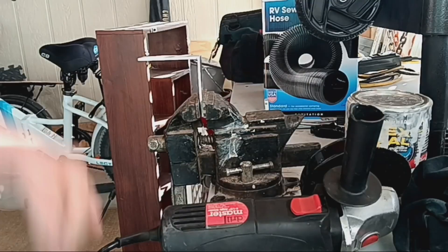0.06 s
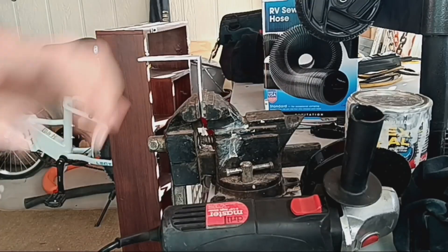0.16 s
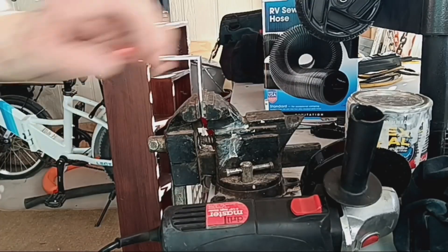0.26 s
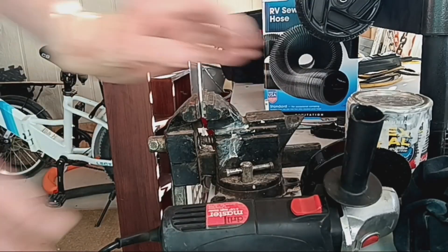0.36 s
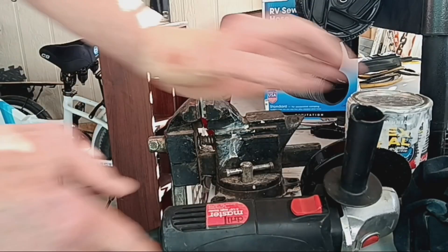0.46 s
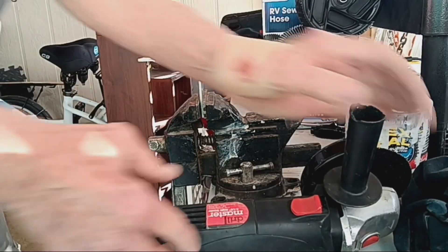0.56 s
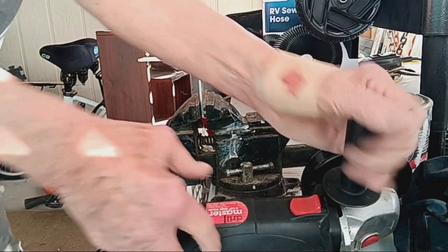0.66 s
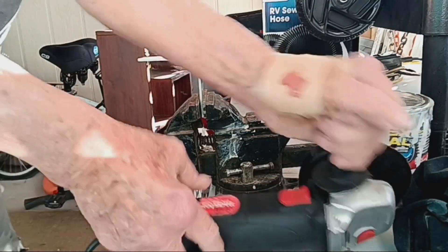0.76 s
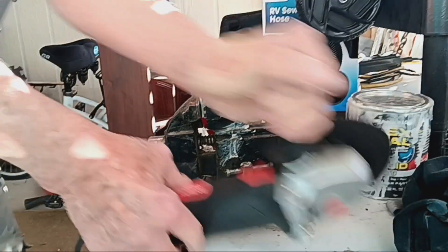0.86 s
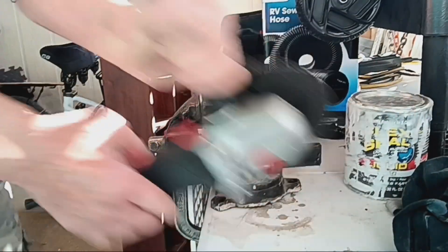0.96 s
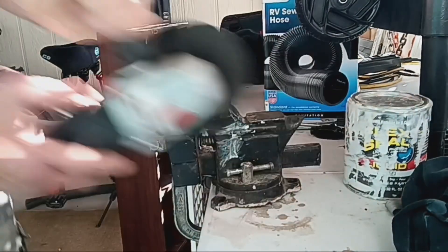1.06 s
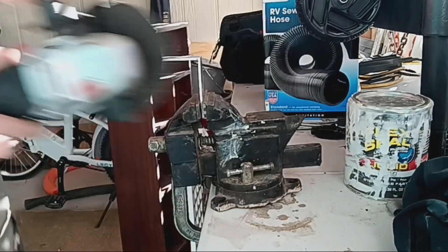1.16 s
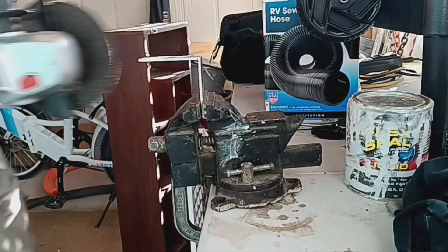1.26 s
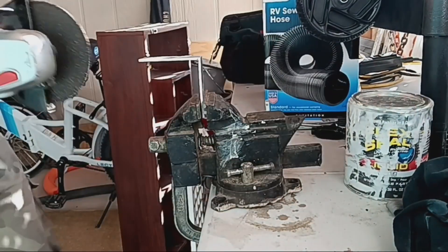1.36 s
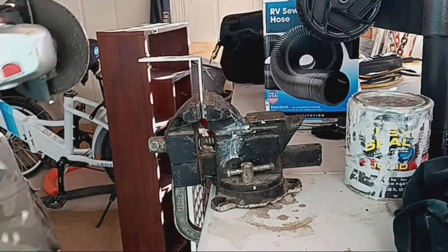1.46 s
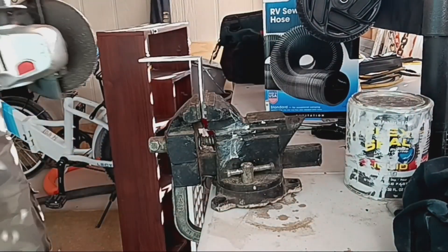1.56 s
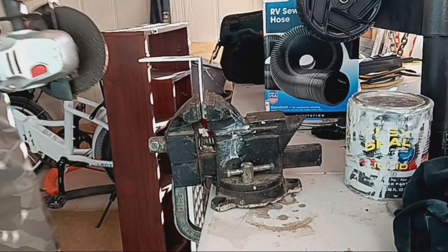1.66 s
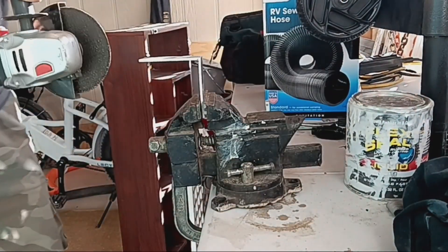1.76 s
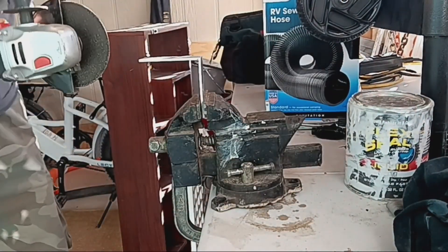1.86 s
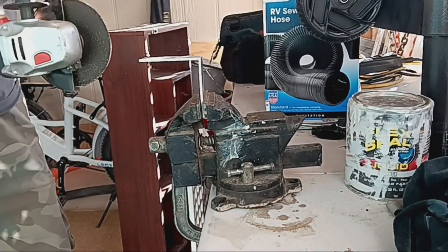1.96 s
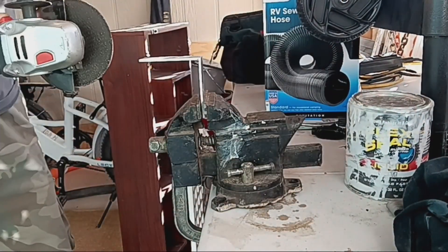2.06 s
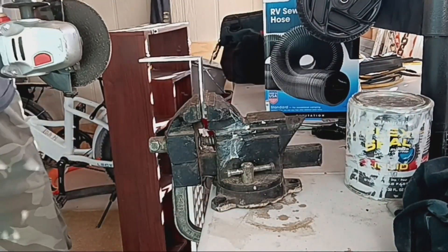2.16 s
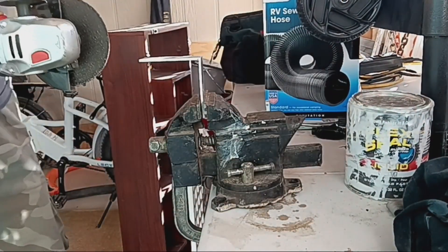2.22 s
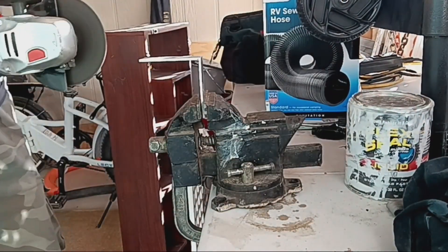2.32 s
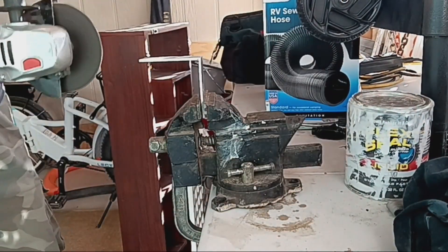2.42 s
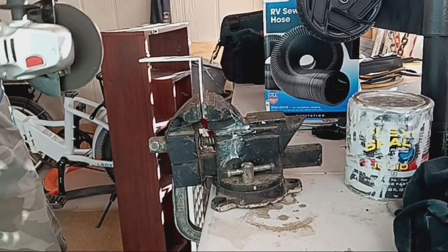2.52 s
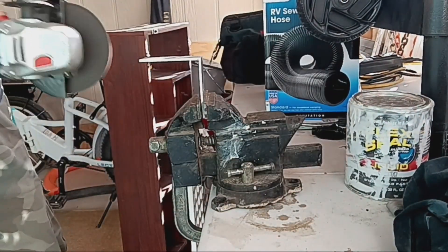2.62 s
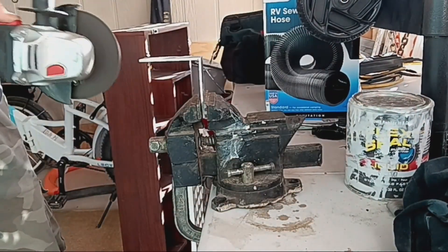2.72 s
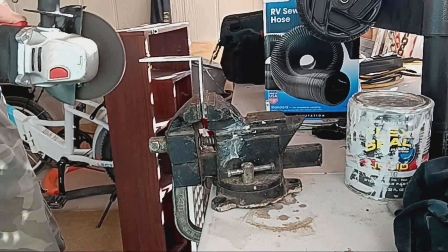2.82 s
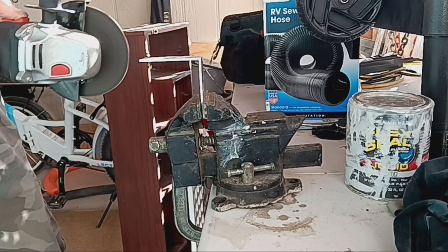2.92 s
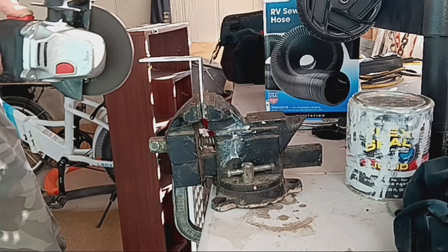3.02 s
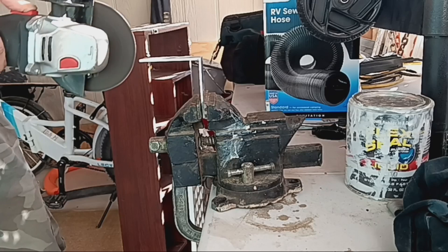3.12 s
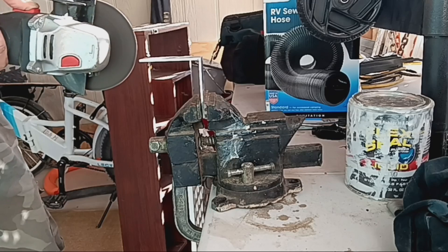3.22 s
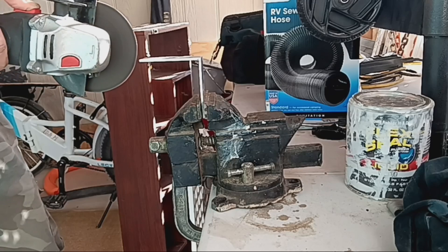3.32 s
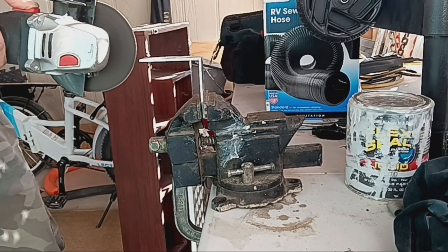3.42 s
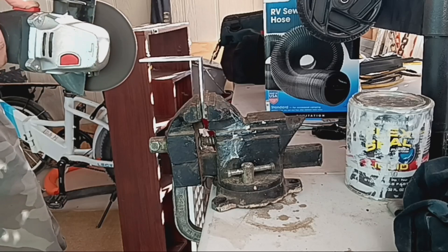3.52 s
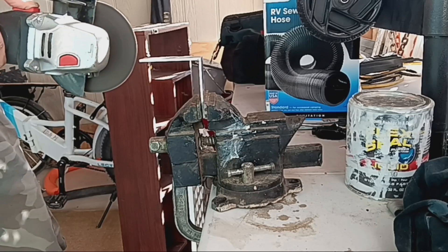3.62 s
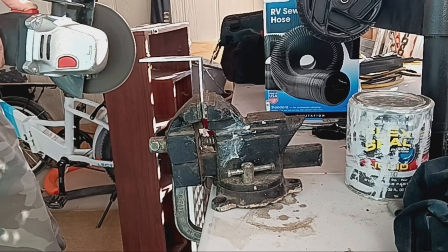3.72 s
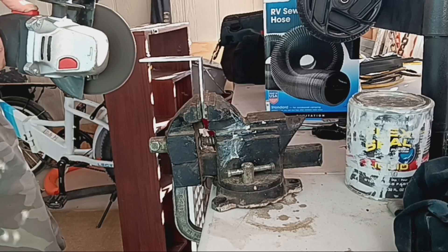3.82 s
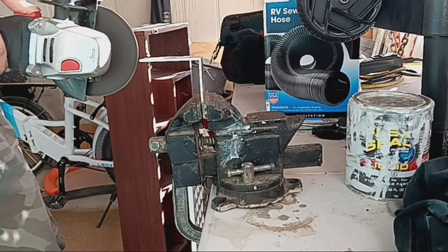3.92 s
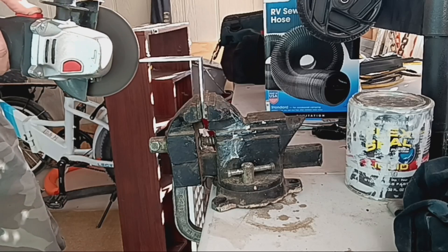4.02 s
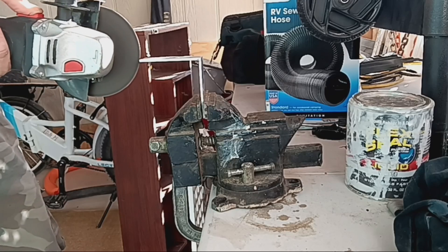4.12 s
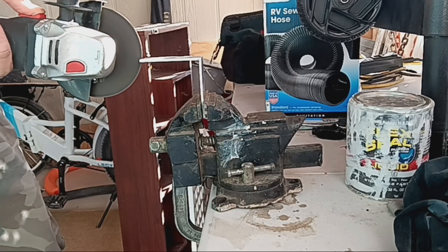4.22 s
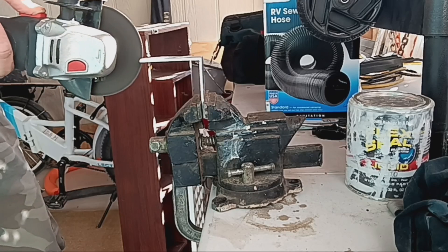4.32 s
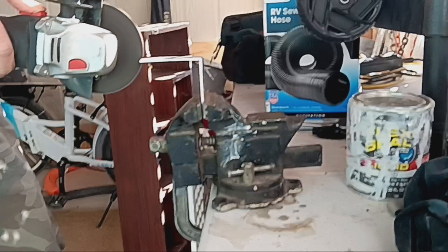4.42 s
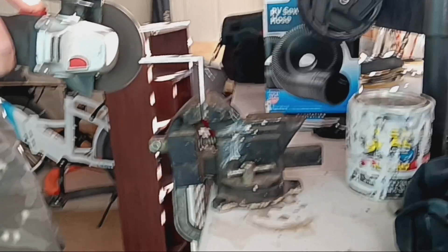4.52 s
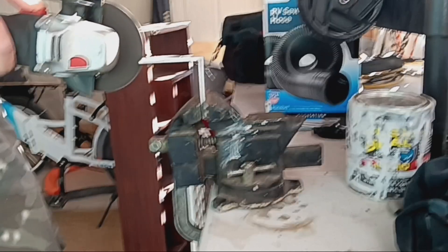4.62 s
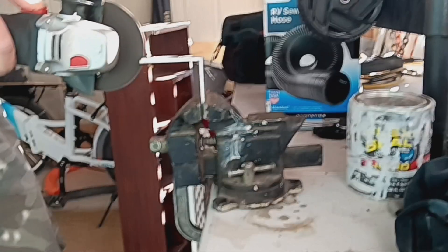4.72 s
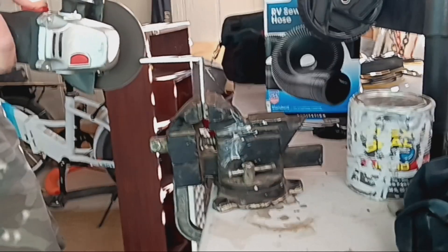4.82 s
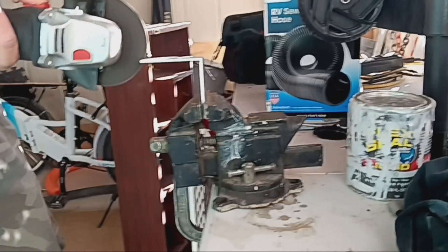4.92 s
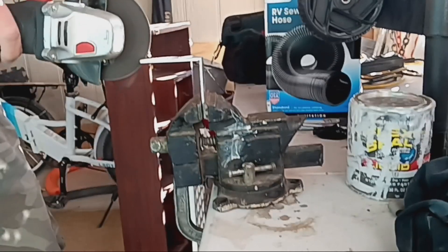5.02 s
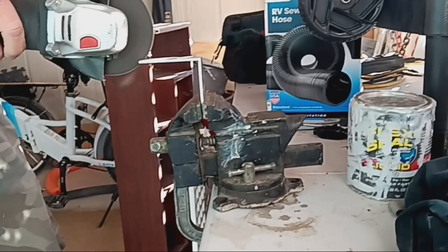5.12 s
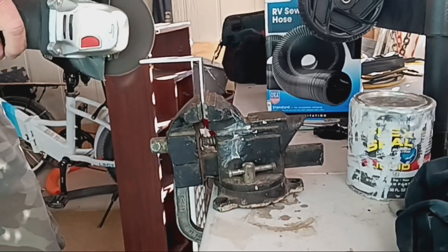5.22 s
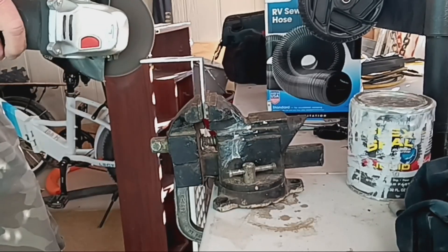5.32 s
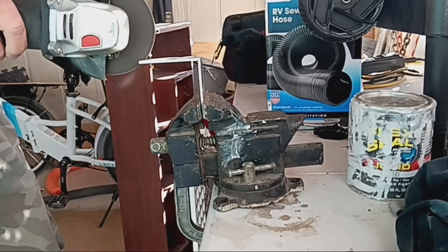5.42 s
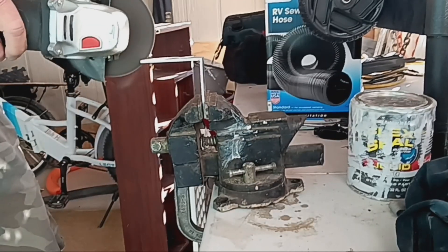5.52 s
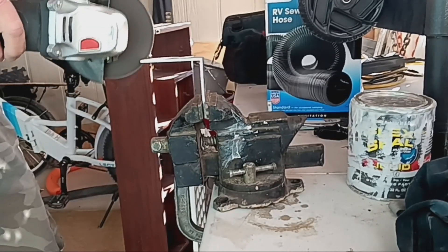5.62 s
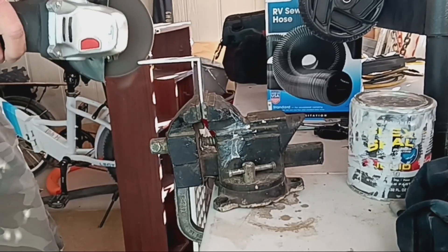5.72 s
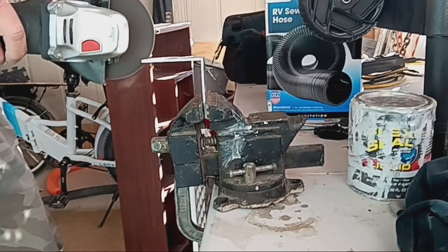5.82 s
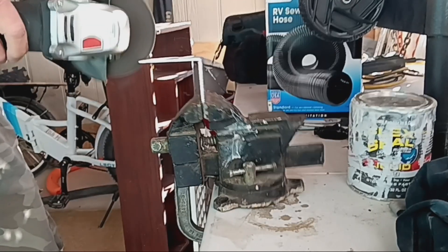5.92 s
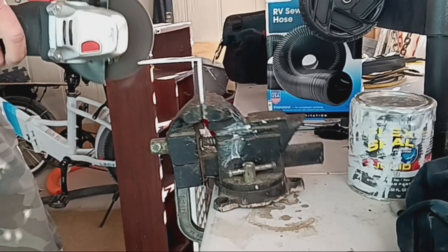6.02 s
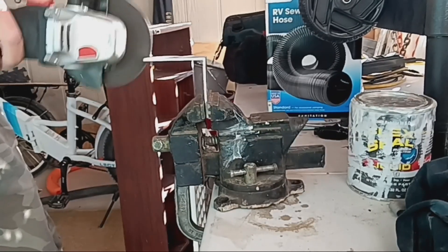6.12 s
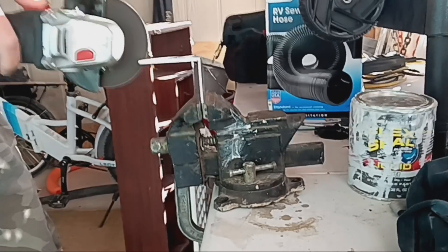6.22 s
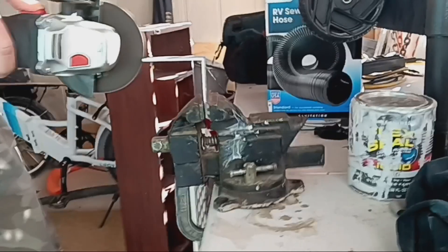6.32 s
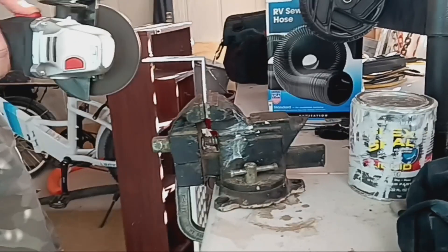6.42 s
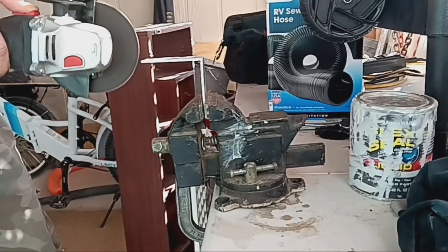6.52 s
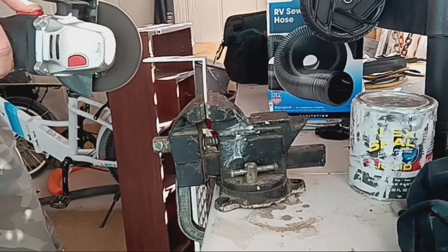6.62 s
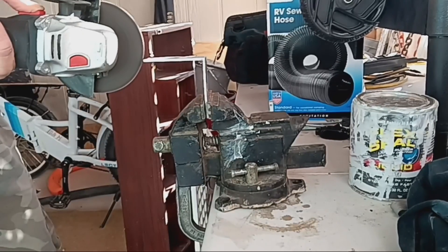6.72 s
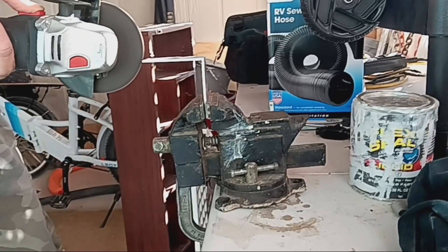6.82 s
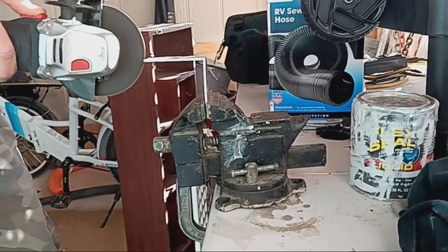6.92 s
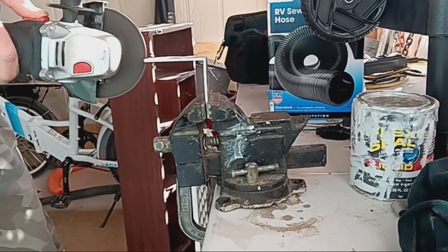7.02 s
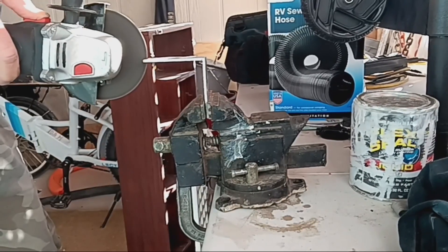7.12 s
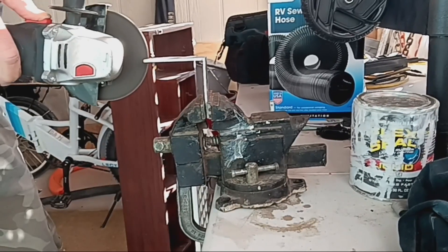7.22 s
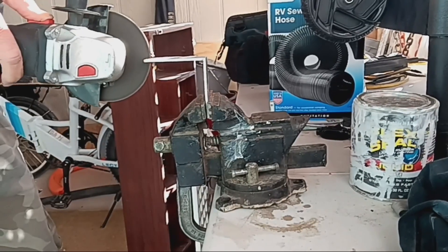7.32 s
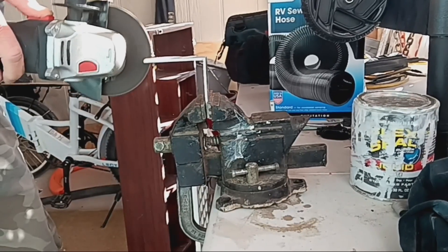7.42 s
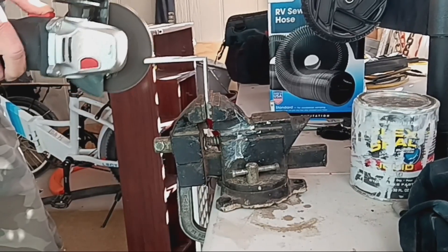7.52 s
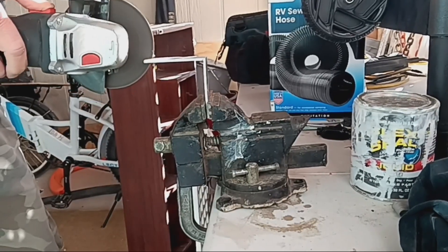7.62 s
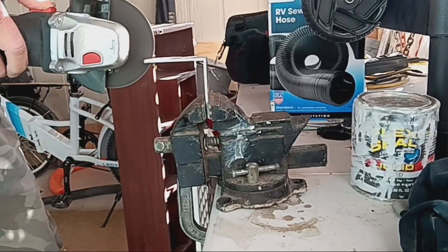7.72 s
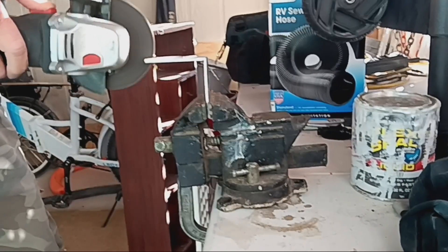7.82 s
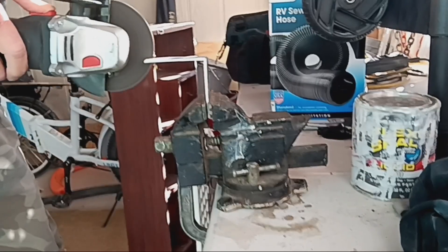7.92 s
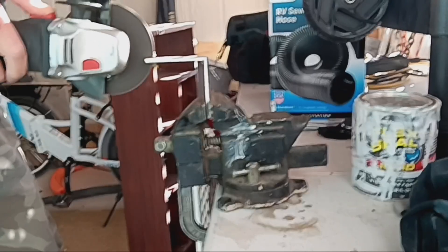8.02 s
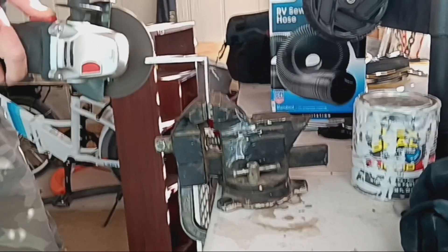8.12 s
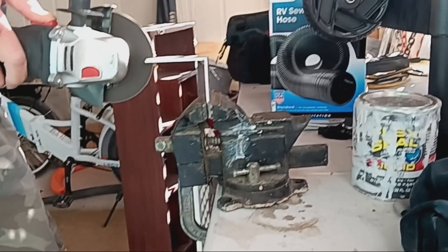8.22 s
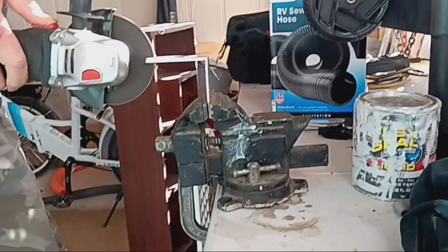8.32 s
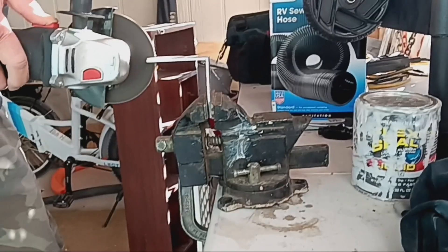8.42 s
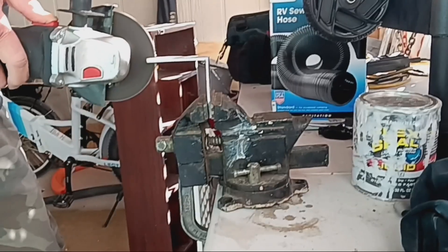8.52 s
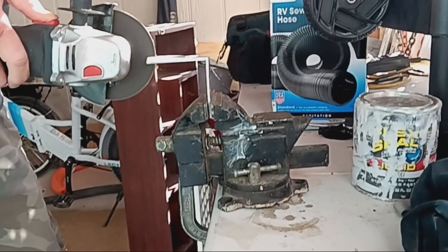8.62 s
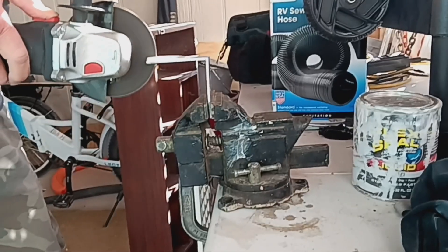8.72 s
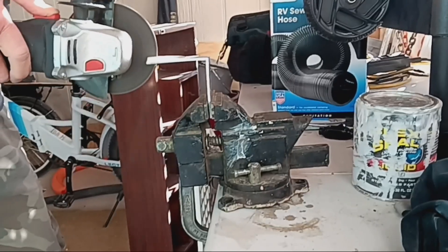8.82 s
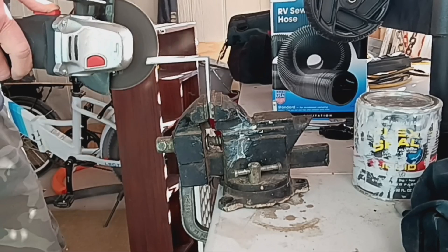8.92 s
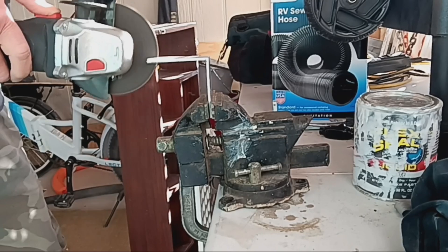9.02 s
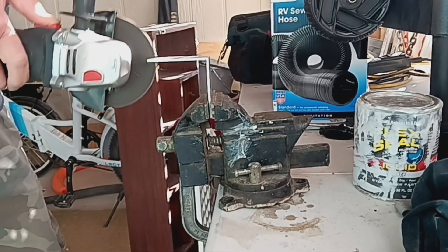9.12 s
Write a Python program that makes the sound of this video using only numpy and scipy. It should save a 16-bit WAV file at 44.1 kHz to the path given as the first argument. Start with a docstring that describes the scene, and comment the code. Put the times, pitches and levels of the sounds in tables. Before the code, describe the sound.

Bumps and plastic clicks, then a power tool revs into a loud rattling whine and its disc tears through metal twice, screeching brightly.

```python
"""An angle grinder is lifted off a workshop bench, switched on and pressed twice into a steel bar held in a vice.
Its motor runs up: fan and gear noise makes the housing ring, the gears rattle and the guard answers their clacks.
In the cut, many tiny blows of grit tear at the steel while disc and bar sing in narrow, sliding rings.
Sparks pelt the two ports of a phone standing close by, which overloads; bumps reach it through its stand.
Clicks, scuffs, rumble, sliding and three juddering jerks go with the handling; a thin hiss fills the quiet before."""
import sys
import numpy as np
from scipy import signal
from scipy.fft import rfft, irfft
from scipy.io import wavfile

SR = 44100
rng = np.random.default_rng(int(sys.argv[2]) if len(sys.argv) > 2 else 0)


def transcribe(u):
    """Save the signal u as a 16-bit wav file named by the first command-line argument.

    u: samples, shape (n,) or (channels, n), limited to [-1, 1]; the rate is SR.
    q: integer samples, one column per channel.
    """
    v = np.clip(np.atleast_2d(u).T, -1, 1)
    q = np.round(v * 32767).astype(np.int16)
    wavfile.write(sys.argv[1], SR, q)


N = 403956
TIME = np.arange(N) / SR


def undb(db):
    """Decibels to gain."""
    return 10 ** (np.asarray(db) / 20)


def unit(x):
    """Scale to rms 1."""
    return x / np.sqrt(np.mean(x ** 2))


def curves(rows):
    """Each column of a table of (time [s], ..) rows as a line through time."""
    s, *columns = np.transpose(rows)
    return [np.interp(TIME, s, c) for c in columns]


def gate(start, end, fade):
    """Open from start to end, with straight fades inside."""
    return np.clip(np.minimum(TIME - start, end - TIME) / fade, 0, 1)


def swell(s, rise_s, fall_s):
    """Rises to 1 at time s and dies away, by 20 dB in each of the given times."""
    return undb(-20 * np.maximum((s - TIME) / rise_s, (TIME - s) / fall_s))


def lag(x, seconds):
    """Follow x sluggishly, with a time constant."""
    keep = np.exp(-1 / (seconds * SR))
    return signal.lfilter([1 - keep], [1, -keep], x)


def walk(rate):
    """Smooth random wandering with a spread near 1, heading for a new value rate times a second."""
    knots = rng.standard_normal(N // 8)
    return 1.2 * np.interp(TIME * rate, np.arange(len(knots)), knots)


def noise():
    """Unrelated noise for the two ports."""
    return rng.standard_normal((2, N))


def impacts(rate, scatter_db):
    """Random tiny blows of uneven size, rate per second, unrelated at the two ports."""
    return (rng.random((2, N)) < rate / SR) * noise() * undb(scatter_db * noise())


def colour(x, points):
    """Shape the tone through (frequency [Hz], level [dB]) points, with a filter that never acts early."""
    size = 8192
    hz, db = np.transpose(points)
    gain = undb(np.interp(np.log(np.fft.rfftfreq(size, 1 / SR) + 1), np.log(hz), db))
    # folding the cepstrum puts the whole response after the sound that excites it
    cepstrum = irfft(np.log(gain))[:size // 2]
    cepstrum[1:] *= 2
    response = irfft(np.exp(rfft(cepstrum, size)))[:size // 2]
    return signal.oaconvolve(x, response[None], axes=-1)[:, :N]


def resonate(x, hz, width_hz):
    """One resonance, gain 1 at its centre."""
    peak = signal.iirpeak(min(hz, SR / 2 - 1), hz / min(width_hz, SR / 4), fs=SR)
    return signal.lfilter(*peak, x)


def add(track, s, sound):
    """Mix a short sound in at time s."""
    i = int(s * SR)
    track[:, i:i + sound.shape[-1]] += sound[..., :N - i]


def split(left_minus_right_db):
    """Gains that favour the left port over the right by the given level."""
    return undb(np.array([[left_minus_right_db], [-left_minus_right_db]]) / 2)


# the switch closes, then the motor takes hold
SWITCH_S, START_S = 2.157, 2.17
# free speed, speed at which back voltage halves the current, pull at standstill, drag of a full cut
FREE_HZ, HALF_CURRENT_HZ, PULL_HZ_PER_S, DRAG_HZ_PER_S = 546, 300.5, 7600, 360
# level setting at free speed, change towards standstill, gain while the switch closes, change at full load
MOTOR_DB, STANDSTILL_DB, SWITCH_DB, LOADED_DB = -11.5, -3.5, -12, -5.5

# rush of fan, brushes and gears: (frequency [Hz], level per Hz [dB])
RUSH_TONE = [(60, -28), (300, -19.5), (800, -22), (1400, -17.5), (1850, -8.5), (2500, -9.5), (3900, -6.5),
             (6500, -3), (7800, -5), (8700, -3.5), (9600, 4), (11200, -7.5), (13500, -10.5), (15500, -12.5)]


def motor(shaft_hz, load, ideal_hz=600, rattle_share=.47, ring_db=-6.0, recover_s=0.2):
    """A series motor throbs with the mains, rattles while the gears pull the disc up, and recedes under load."""
    angle = 2 * np.pi * np.cumsum(shaft_hz * (1 + 0.00307 * walk(40))) / SR
    slip = np.clip(1 - shaft_hz / ideal_hz, 0, 1)  # the current falls as the speed rises
    strain = lag(load, recover_s)
    mains = np.cos(2 * np.pi * 120 * TIME)
    # the backlash rattle slows down as the torque eases
    rattle_hz = rattle_share * ideal_hz * slip * (1 + .2 * walk(50))
    rattle = np.cos(2 * np.pi * np.cumsum(rattle_hz) / SR)
    throb_db = 4 * slip * mains + 2.0 * np.sqrt(slip) * rattle + 0.89 * walk(150)
    drive = (radiated() + shaft_harmonics(angle)) * undb(throb_db)
    rush = unit(colour(drive, RUSH_TONE))
    ring = undb(ring_db) * unit(housing_ring(drive))
    sound = rush + ring + guard(rattle, load) + whine(shaft_hz, angle, strain)
    power = np.maximum(undb(SWITCH_DB) * gate(SWITCH_S, np.inf, .002), gate(START_S, np.inf, 0.003))
    speed_db = STANDSTILL_DB * (1 - shaft_hz / FREE_HZ)
    return power * undb(MOTOR_DB + speed_db + LOADED_DB * strain) * sound


def shaft_speed(load):
    """Turns per second: torque goes with the square of the current, against friction and the drag of the cut."""
    def torque(hz):
        return PULL_HZ_PER_S / (1 + hz / HALF_CURRENT_HZ) ** 2

    hop = 64  # samples per step
    hz, speeds = 0., []
    for s, drag in zip(TIME[::hop], DRAG_HZ_PER_S * load[::hop]):
        if s > START_S:
            # friction just balances the pull at free speed
            hz = max(hz + (torque(hz) - torque(FREE_HZ) - drag) * hop / SR, 0)
        speeds.append(hz)
    return np.interp(TIME, TIME[::hop], speeds)


def radiated(shared=0.35, lag_s=0.001155):
    """Noise of the tool at the two ports: partly diffuse, partly one sound that comes later on the left."""
    left, right = noise()
    share = np.clip(shared, 0, 1)
    late = np.roll(right, int(lag_s * SR))
    return np.array([share * late + np.sqrt(1 - share ** 2) * left, right])


# tones that sweep through the housing's resonances: (multiple of shaft speed, level before wandering [dB])
SHAFT_TONES = [(3, -26), (5, -23), (6, -31), (8, -26), (9, -28.5), (10, -24.5), (11, -37)]


def shaft_harmonics(angle):
    """Tones at whole multiples of the shaft speed, each wandering in strength."""
    tones = 0
    for multiple, db in SHAFT_TONES:
        start_phase = rng.uniform(0, 2 * np.pi, (2, 1))
        tones = tones + undb(db + 5.26 * walk(8.2)) * np.sin(round(multiple) * angle + start_phase)
    return tones


# resonances of gear head and disc: (frequency [Hz], width [Hz], relative level [dB])
HOUSING_RINGS = [(1423, 51, -8), (1580, 126, -6), (2310, 84, -12), (2600, 110, -11), (3280, 190, -2),
                 (3525, 75, 0), (4400, 180, 0.5), (4880, 150, -1), (5480, 96, -2), (6220, 170, -7.5),
                 (6910, 85, 2), (8780, 135, 2.5)]


def housing_ring(drive):
    """Gear head and disc resonate; each resonance comes and goes as the tool turns in the hands."""
    return sum(undb(db + 1.9 * walk(9)) * resonate(drive, hz, width) for hz, width, db in HOUSING_RINGS)


# running free; change when held still by the load; push as the disc springs clear, and its settling time
GUARD_DB, GUARD_HELD_DB, GUARD_SHAKEN_DB, GUARD_SETTLE_S = -19, -10, 23, .35


def guard(rattle, load, hz=4400, width_hz=80, clack_db=10, grip_s=0.031):
    """Every clack of the gears strikes the loose guard, hardest just after the load lets go."""
    clacks = radiated() * undb(clack_db * rattle)
    held = lag(load, grip_s)
    shaken = np.maximum(lag(load, GUARD_SETTLE_S) - held, 0)
    level = undb(GUARD_DB + GUARD_HELD_DB * held + GUARD_SHAKEN_DB * shaken)
    return level * unit(resonate(clacks, hz, width_hz))


# how well the body radiates the shaft's whine: (shaft speed [Hz], level before load and wandering [dB])
WHINE_LEVEL = [(190, -57), (270, -29), (440, -24), (510, -32.5), (548, -40)]


def whine(shaft_hz, angle, strain, loaded_db=-5):
    """A pure tone at the shaft speed, weaker under load."""
    db = np.interp(shaft_hz, *np.transpose(WHINE_LEVEL)) + loaded_db * strain + 0.96 * walk(20)
    return undb(db) * np.sin(angle + np.array([[0], [1]]))


# grinding of a graze, and grinding that counts as a full load; fade of each touch
GRAZE_GRIT_DB, FULL_GRIT_DB, BITE_FADE_S = -29, -24.5, .025

# levels here come before the gains of grit and sparks
# the disc grazes the bar throughout each pass: (start [s], end [s], spark stream [dB])
GRAZES = [(4.11, 6.2, -26), (6.979, 9.2, -36.5)]
# it skips and bites briefly on the way in and out: (start [s], end [s], spark stream [dB], grinding [dB])
SHORT_BITES = [(4.13, 4.185, -18.5, -25), (4.205, 4.31, -19, -26), (6.05, 6.17, -15, -23.5),
               (6.98, 7.035, -27, -26), (7.06, 7.115, -28.5, -25), (7.145, 7.222, -20.5, -23)]
# hand pressure, one list for each of the two long cuts: (time [s], spark stream [dB], grinding [dB])
LONG_CUTS = [
    [(4.31, -27, -20), (4.328, -17, -24.5), (4.688, -16, -25), (5.8, -14.5, -25), (5.834, -21.5, -25),
     (5.872, -14, -26), (5.994, -17.5, -26.5), (6.01, -26.5, -26)],
    [(7.23, -26, -24), (7.25, -16, -27), (7.288, -16, -25), (7.686, -16, -27), (8.164, -18, -27.5),
     (8.868, -14.5, -25), (8.976, -19.5, -28.5), (9.16, -17.5, -29.5)],
]


def contact():
    """Strength of the spark stream and of the grinding: a graze, brief bites and the long cuts."""
    stream = bite = 0
    for start, end, stream_db in GRAZES:
        graze = gate(start, end, BITE_FADE_S)
        stream = stream + graze * undb(stream_db)
        bite = bite + graze * undb(GRAZE_GRIT_DB)
    touches = list(SHORT_BITES)
    for rows in LONG_CUTS:
        touches.append((rows[0][0], rows[-1][0] + BITE_FADE_S, *curves(rows)))
    for start, end, stream_db, bite_db in touches:
        touch = gate(start, end, BITE_FADE_S)
        stream = np.maximum(stream, touch * undb(stream_db))
        bite = np.maximum(bite, touch * undb(bite_db))
    return stream, bite


# grit tearing steel: (frequency [Hz], level per Hz [dB])
GRIT_TONE = [(800, -19.5), (2400, -1), (4000, -6), (5800, -3.5), (6800, -6), (7600, -2.5), (8500, 0.5),
             (9600, -2), (11000, -0.5), (12200, -7.5), (13300, -0.5), (14400, -4.5), (15700, -10)]


def grit(bite, shaft_hz, level_db=13):
    """Abrasive grains tear the steel in tiny blows, unevenly over each turn of the disc."""
    disc_turns = np.cumsum(shaft_hz) / SR / 2.7  # the bevel gear slows the disc
    scrub = undb(0.44 * np.cos(2 * np.pi * disc_turns) + 0.96 * walk(60) + 0.37 * walk(16))
    return undb(level_db) * unit(colour(impacts(16000, 1.6), GRIT_TONE)) * bite * scrub


# a spark striking a port: (frequency [Hz], level per Hz [dB])
SPARK_TONE = [(20, -15), (50, -1), (150, 0), (400, -3), (1000, -5.5), (2000, -10), (4000, -11.5),
              (7000, -23), (12000, -37)]


def sparks(stream, level_db=6, left_db=4.5, rate=2200, crackle_db=-11, crackle_hz=1200):
    """Sparks strike the ports: a thin stream is a few separate pops, a full one a roar."""
    density = np.clip(stream / stream.max(), .01, 1)
    pelting = impacts(rate * density, 2.2) / np.sqrt(density)
    # coarser chips come in flurries and crackle on the case
    chips = impacts(1200 * density, 1.8) / np.sqrt(density)
    crackle = unit(resonate(chips, crackle_hz, 1.53 * crackle_hz)) * undb(crackle_db + 2.6 * walk(12))
    flutter = undb(1.44 * np.array([walk(45), walk(45)]) + 2.3 * walk(22))
    return undb(level_db) * split(left_db) * (unit(colour(pelting, SPARK_TONE)) + crackle) * stream * flutter


# rings of disc and bar; most in the cut sink as the steel heats and the slot deepens:
# (start [s], end [s], start pitch [Hz], end pitch [Hz], width [Hz], relative level [dB])
SLIDING_RINGS = [(2.18, 2.36, 2620, 2560, 160, -7), (2.18, 2.55, 8700, 8750, 400, -3),
                 (2.59, 2.71, 2240, 2320, 60, -14), (4.14, 4.45, 9250, 9050, 130, -5),
                 (4.3, 4.79, 8740, 8530, 80, -2.5), (4.17, 6.15, 11900, 10950, 190, -6),
                 (4.14, 4.9, 10600, 10380, 150, -3), (4.85, 6.08, 10260, 10160, 120, -.5),
                 (4.8, 6.0, 9400, 9250, 130, -4.5), (4.3, 6.1, 6850, 6700, 220, -4.5),
                 (5.0, 6.1, 15700, 15620, 100, -10), (6.875, 6.905, 10850, 10800, 150, 6),
                 (6.99, 7.25, 7080, 7050, 130, -3), (7.3, 9.16, 6900, 6780, 170, -10),
                 (6.99, 9.16, 8680, 8430, 100, -6.5), (7.28, 8.68, 10760, 9900, 130, 1.5),
                 (7.9, 9.16, 10350, 9980, 200, -3), (8.7, 9.16, 9550, 9350, 180, -4),
                 (7.05, 7.7, 12680, 12560, 140, -12)]


def singing(level_db=-17, flutter_db=2.5):
    """Narrow rings, mostly of disc and bar, kept going by gears and grit, each sliding slowly in pitch."""
    out = np.zeros((2, N))
    for start, end, from_hz, to_hz, width_hz, db in SLIDING_RINGS:
        opening = gate(start - .012, end + .012, .024)
        span = opening > 0
        strength = (opening * undb(db + flutter_db * walk(18)))[span]
        pitch_hz = np.interp(TIME[span], [start, end], [from_hz, to_hz])
        phase = 2 * np.pi * np.cumsum(pitch_hz) / SR
        # slow noise on a sine and a cosine makes a narrow band around the sliding pitch
        kicks = rng.standard_normal((2, 2, N // 2))[..., :len(phase)]
        a, b = unit(signal.lfilter([1], [1, -np.exp(-np.pi * width_hz / SR)], kicks))
        out[:, span] += strength * (a * np.cos(phase) + b * np.sin(phase))
    return undb(level_db) * out


# what the phone's case rings with: (frequency [Hz], level [dB], time to fall 60 dB [s])
CASE_RINGS = [(422, -20, 0.016), (830, -19, 0.021), (1210, -22, 0.018), (1650, -21, 0.017),
              (2050, -34, .009), (2500, -39, .008)]
# bumps that reach the phone through its stand: (time [s], thud [dB], tap [dB], left minus right [dB])
STAND_BUMPS = [(.41, -46, -41, 0), (.444, -45, -30, 0), (0.6625, -12, -10, 1), (.733, -31, -24, 10),
               (1.195, -44, -45, -1), (1.4223, -22, -8.5, -0.5), (1.85, -42, -31, 0),
               (1.908, -34, -21.5, -1), (2.268, -32, -12.5, 0), (2.438, -29, -27, -2),
               (3.169, -9.5, -13, -0.5), (3.45, -33, -21, -2), (4.12, -10.5, -12.5, 0.5),
               (4.154, -12, -18, 4), (4.419, -15.5, -18, 3), (6.023, -10.5, -20, -9),
               (6.601, -11.5, -13, -2), (6.875, -17, 1.5, 12), (7.232, -9.5, -24, 0), (9.126, -11, -20, 3)]


def bumps(stand_hz=66, stand_t60=0.07, tap_s=0.00043):
    """Each bump is a sharp tap with a short ring of the case, then the phone rocks on its stand."""
    out, t = np.zeros((2, N)), TIME[:SR // 5]
    rocking = np.cos(2 * np.pi * stand_hz * t - .3) * undb(-60 * t / stand_t60)
    thud = 2.0 * rocking * (1 - np.exp(-t / 0.0018))
    ring = sum(np.sin(2 * np.pi * hz * t) * undb(db - 60 * t / t60) for hz, db, t60 in CASE_RINGS)
    tap = (1 - np.exp(-t / .0001)) * np.exp(-t / tap_s) + ring
    tap = signal.sosfilt(signal.butter(8, 2600, fs=SR, output="sos"), tap)
    for s, thud_db, tap_db, pan_db in STAND_BUMPS:
        add(out, s, (undb(thud_db) * thud + undb(tap_db) * tap) * split(pan_db))
    return out


# clicks of the grinder's handle, guard and cord: (time [s], peak level [dB], centre [Hz])
PART_CLICKS = [(0.729, -22, 2870), (.767, -29, 7000), (.877, -25, 6500), (.978, -15, 8650),
               (.979, -21.5, 2720), (.982, -16, 4500), (1.009, -22, 10000), (1.03, -24, 9000),
               (1.309, -36, 6000), (1.339, -27, 11000), (1.432, -22, 9700), (1.452, -33, 10000),
               (1.507, -32, 9600), (1.530, -29, 10600), (1.614, -25, 10500), (1.659, -34, 10000),
               (1.698, -27, 10400), (1.723, -16, 10900), (1.74, -28, 10000), (1.894, -30, 10200),
               (6.876, -2, 1500)]


def clicks(click_t60=0.012, width_hz=2800, tail_t60=0.31, tail_db=-28):
    """Loose plastic parts tick: short resonant noise, with a short tail from the room."""
    out, t = np.zeros((2, N)), TIME[:SR // 5]
    decay = undb(-60 * t / click_t60) + undb(tail_db - 60 * t / tail_t60)
    for s, db, hz in PART_CLICKS:
        burst = rng.standard_normal((2, len(t))) * decay
        tick = resonate(resonate(burst, hz, width_hz), hz, width_hz)
        add(out, s, undb(db) * tick / np.abs(tick).max())
    return out


# scuffs of hands, sleeve and cord: (start [s], end [s], level before fades [dB], centre [Hz])
HAND_SCUFFS = [(-.04, 0.193, -65, 1800), (0.323, 0.385, -59, 3980), (0.443, 0.702, -51.5, 1700),
               (0.697, .87, -51, 4200), (0.81, 1.083, -39.5, 6160), (.84, 0.935, -52, 1110),
               (1.294, 1.402, -52.5, 3600), (1.31, 1.39, -54, 800), (1.306, 1.393, -51, 278),
               (1.45, 1.624, -68, 2000), (1.575, 1.856, -69, 476), (1.717, 1.762, -55, 11200),
               (1.88, 2.049, -52.5, 2020), (2.09, 2.172, -60, 400)]


def scuffs(relative_width=1.34):
    """Rubbing is an uneven run of tiny catches, each scuff with its own broad resonance."""
    out = np.zeros((2, N))
    fibres = impacts(9000, 2.5) * undb(3.7 * walk(44.8))
    for start, end, db, hz in HAND_SCUFFS:
        span = (TIME >= start) & (TIME < end)
        width_hz = relative_width * hz
        scuff = unit(resonate(resonate(fibres[:, span], hz, width_hz), hz, width_hz))
        out[:, span] += undb(db) * scuff * signal.windows.tukey(span.sum())
    return out


# the tool judders across the bench top in three jerks: (time [s], level [dB])
JERKS = [(.597, -41), (.65, -23.5), (.74, -33.5)]


def judder(rise_s=0.027, fall_s=0.059):
    """Each jerk is a quick swell of low, hollow noise."""
    level = sum(undb(db) * swell(s, rise_s, fall_s) for s, db in JERKS)
    return level * unit(resonate(resonate(noise(), 210, 170), 245, 200))


# tone of the rumble: (frequency [Hz], level per Hz [dB])
RUMBLE_TONE = [(25, 0), (65, 7), (130, 0.5), (200, -10), (320, -7), (600, -18), (1200, -22), (4000, -25),
               (12000, -52)]
# tone of the sliding hiss: (frequency [Hz], level per Hz [dB])
SLIDE_TONE = [(3500, -21), (6000, -5), (8000, -7.5), (9700, 11), (11500, -2), (15500, -10)]
# moves of the tool as it is gripped and lifted, levels before the gains below:
# (peak time [s], time to rise or fall 20 dB [s], bench rumble [dB], sliding hiss [dB])
TOOL_MOVES = [(0, 0.2, -50.5, -73), (.48, 0.07, -52, -72.5), (.61, 0.17, -44, -56), (.71, 0.18, -44, -41),
              (.87, .13, -70, -36), (1.0, .15, -74, -44), (1.17, 0.1, -62, -80), (1.335, .05, -69, -44),
              (1.45, 0.08, -51, -48), (1.535, 0.1, -56, -59), (1.95, 0.3, -57, -92)]


def moves(rumble_db=1, slide_db=2, room_rumble_db=-65.5):
    """The tool slides off the bench in swells of rumble and hiss, over a steady faint room rumble."""
    rumble, slide = undb(room_rumble_db), 0
    for s, fall_s, low_db, high_db in TOOL_MOVES:
        move = swell(s, fall_s, fall_s)
        rumble = rumble + undb(low_db) * move
        slide = slide + undb(high_db) * move
    low = undb(rumble_db) * rumble * unit(colour(noise(), RUMBLE_TONE))
    high = undb(slide_db + 2.2 * walk(37)) * slide * unit(colour(noise(), SLIDE_TONE))
    return low + high


def hiss(level_db=-62.5, hz=9800, width_hz=1300, end_s=1.88, fade_s=0.18):
    """A faint, narrow band of treble noise that dies away before the tool starts."""
    band = resonate(resonate(noise(), hz, width_hz), hz, width_hz)
    return undb(level_db) * unit(band) * gate(-np.inf, end_s, fade_s)


# the left port is deaf to the top treble: (frequency [Hz], level [dB])
LEFT_PORT_TONE = [(100, 2), (1400, 2), (3200, 1), (4500, -2.5), (7300, -3), (8500, -5.5), (9500, -24),
                  (10500, -35), (11200, -45), (15000, -29)]


def scene():
    """The grinding loads the motor; everything airborne passes the ports, the bumps come through the stand."""
    stream, bite = contact()
    load = bite / undb(FULL_GRIT_DB)
    shaft_hz = shaft_speed(load)
    tool = motor(shaft_hz, load) + grit(bite, shaft_hz) + sparks(stream) + singing()
    handling = clicks() + scuffs() + judder() + moves()
    air = tool + handling + hiss()
    return np.vstack([colour(air[:1], LEFT_PORT_TONE), air[1:]]) + bumps()


def record(dry, ceiling=0.82, top_hz=15850):
    """The phone flattens the highest peaks and cuts the top treble."""
    rounded = dry / (1 + (dry / ceiling) ** 6) ** (1 / 6)
    return signal.sosfilt(signal.ellip(14, .2, 70, top_hz, fs=SR, output="sos"), rounded)


dry = scene()
out = record(dry)
transcribe(out)
```